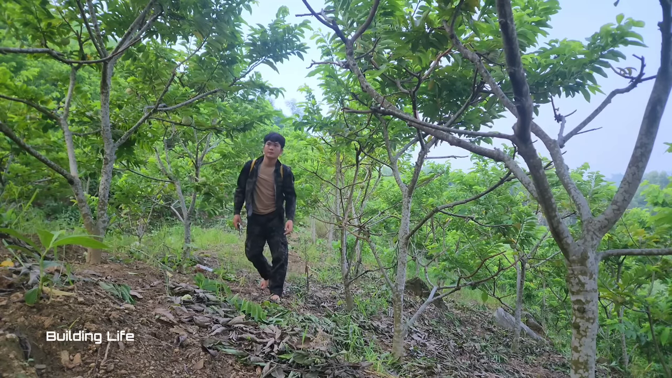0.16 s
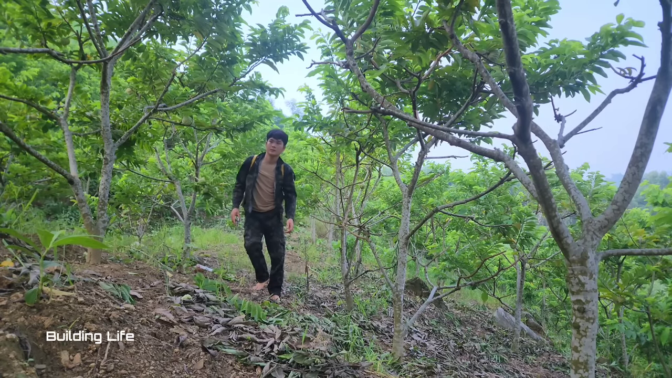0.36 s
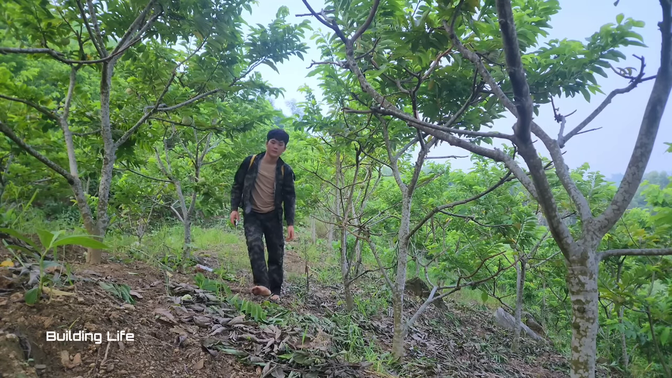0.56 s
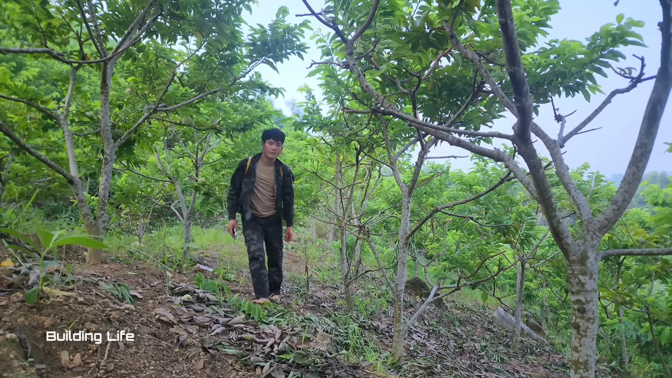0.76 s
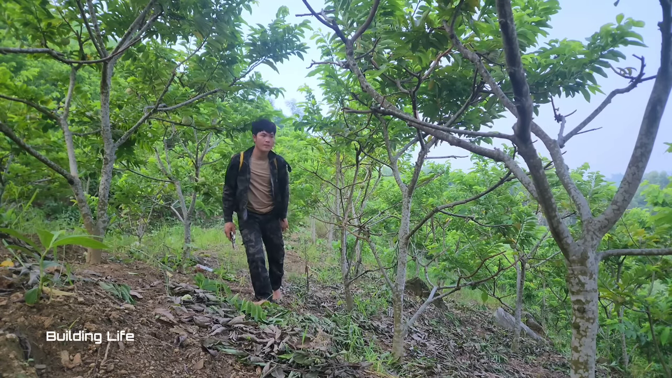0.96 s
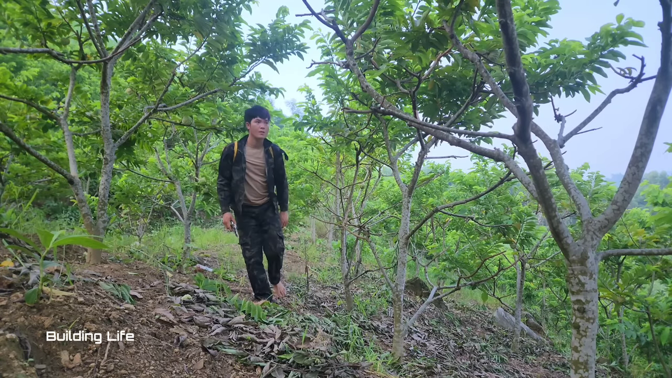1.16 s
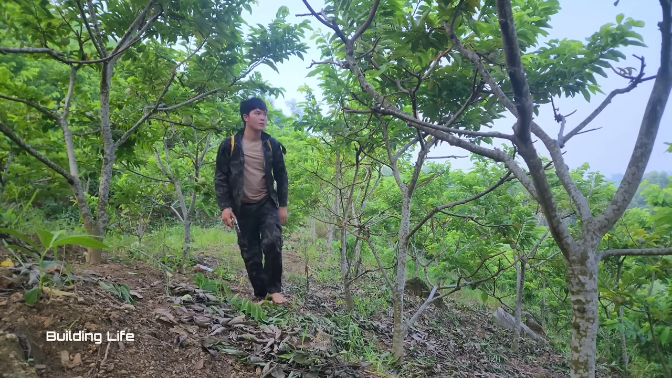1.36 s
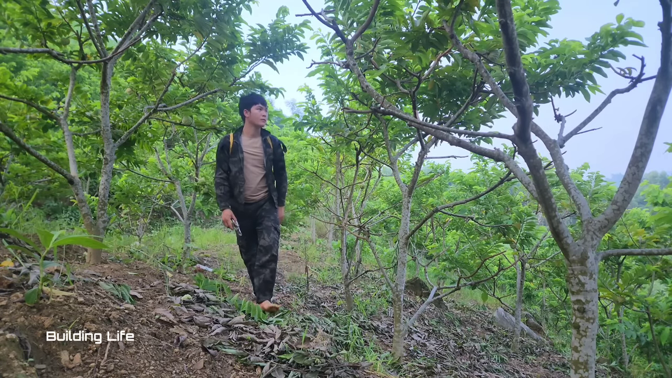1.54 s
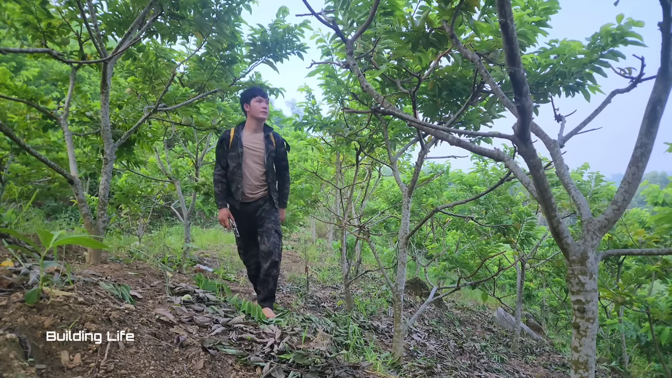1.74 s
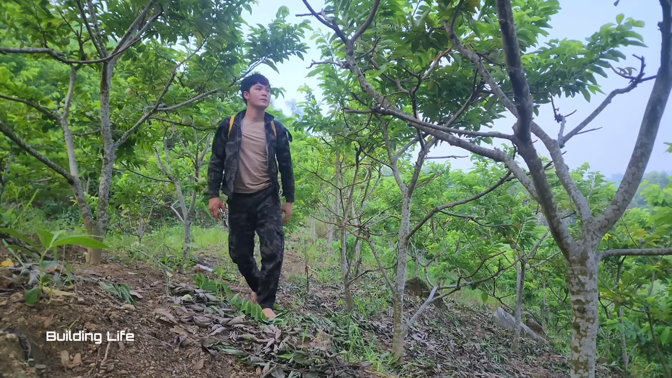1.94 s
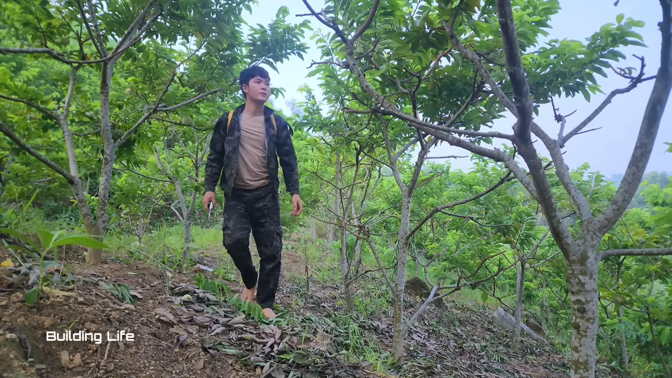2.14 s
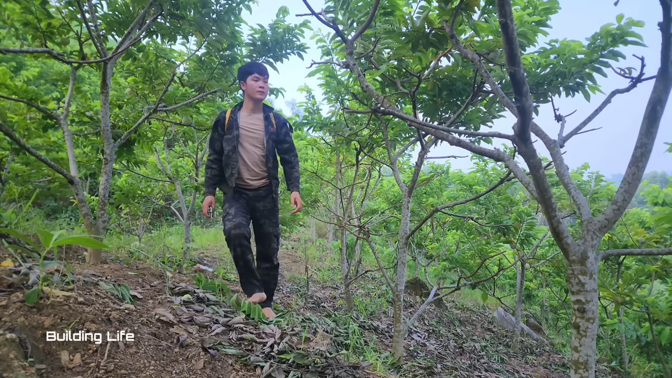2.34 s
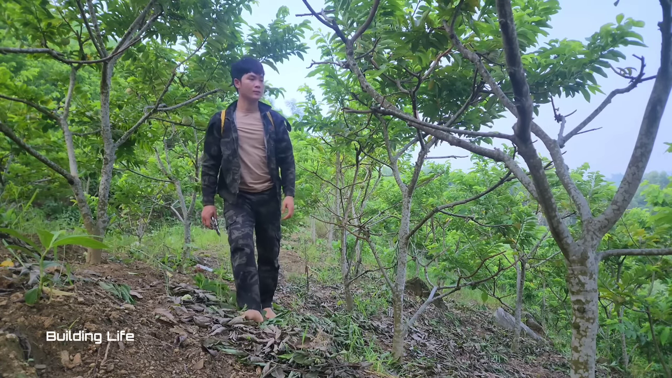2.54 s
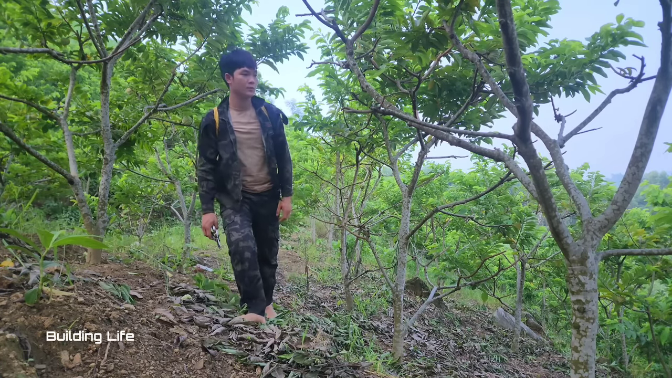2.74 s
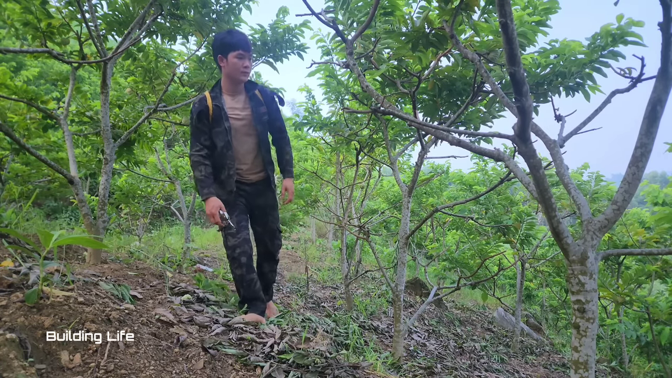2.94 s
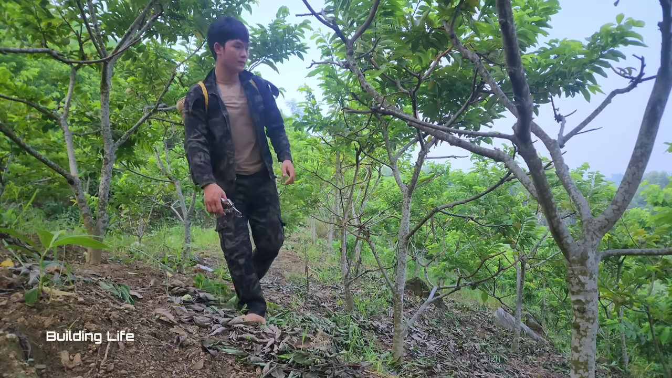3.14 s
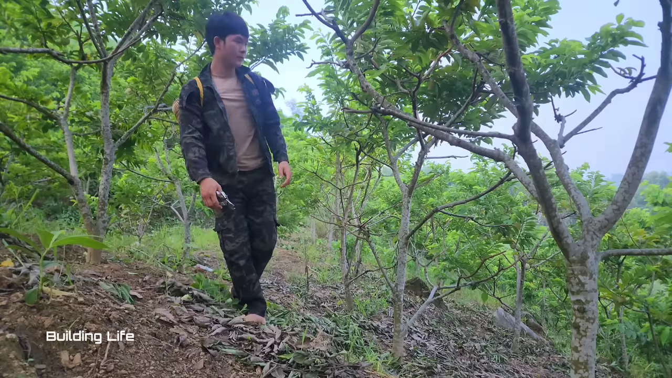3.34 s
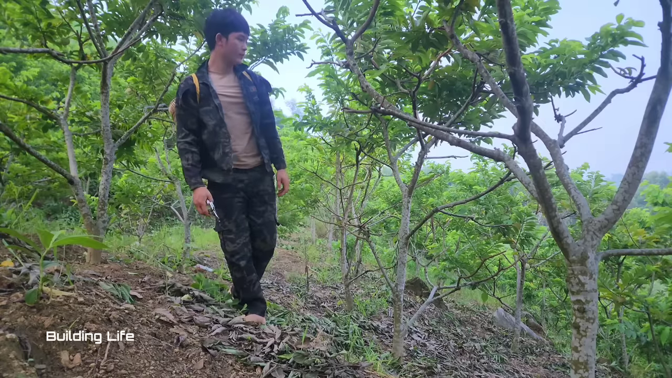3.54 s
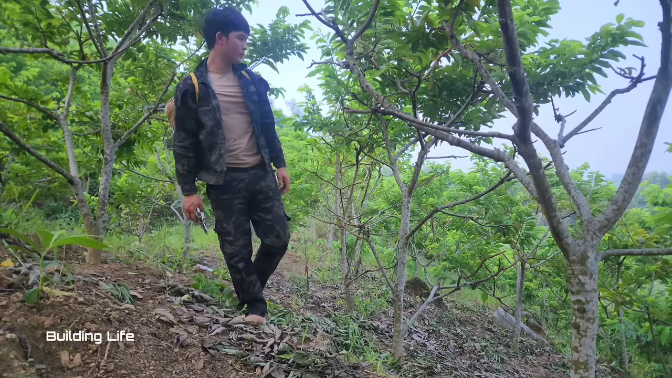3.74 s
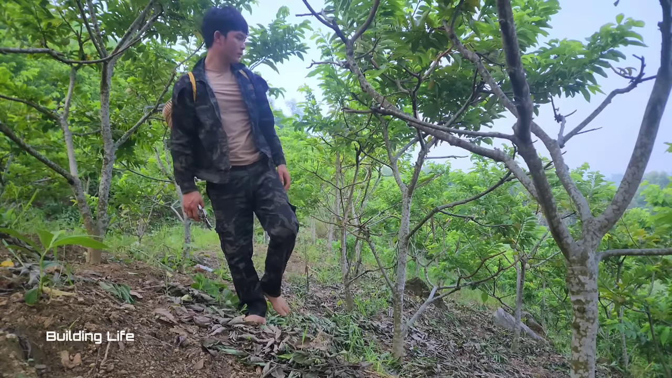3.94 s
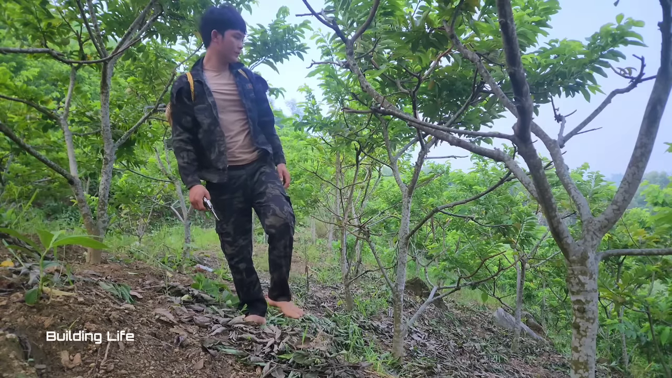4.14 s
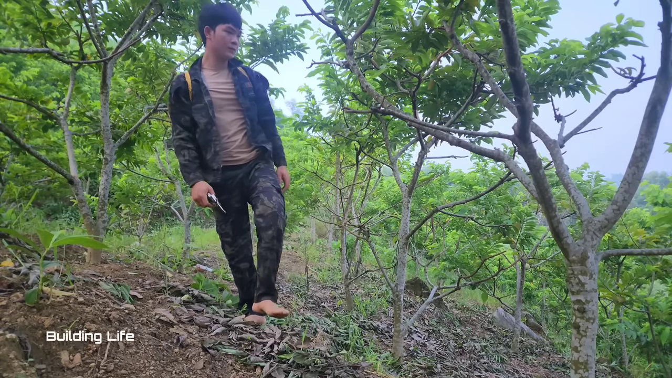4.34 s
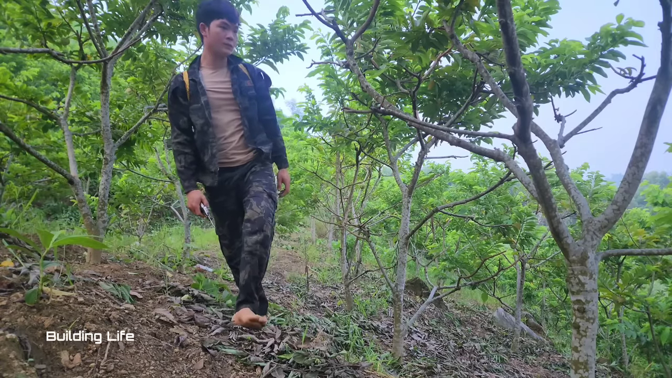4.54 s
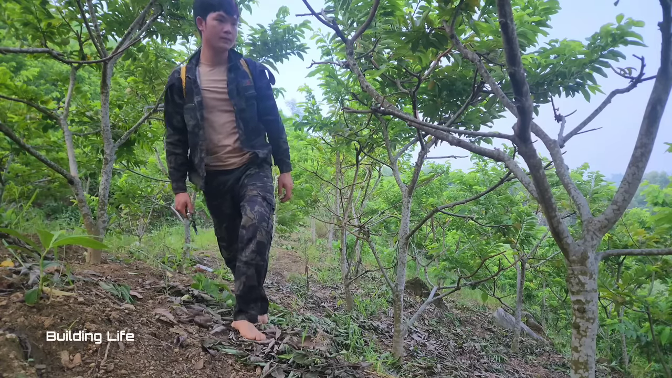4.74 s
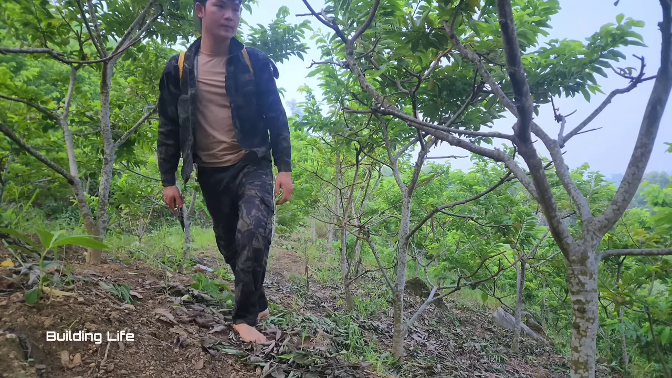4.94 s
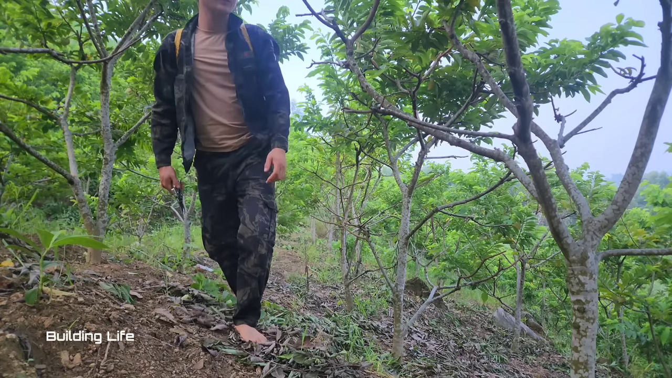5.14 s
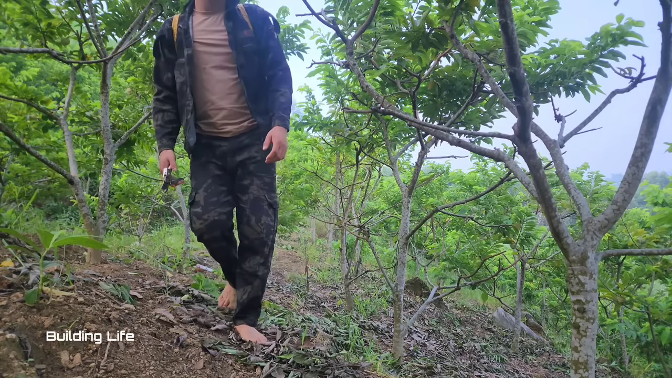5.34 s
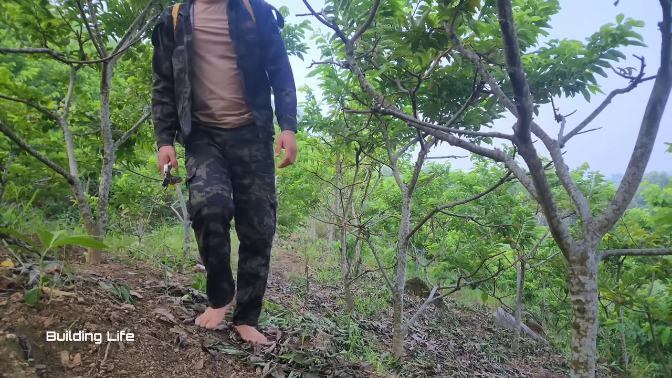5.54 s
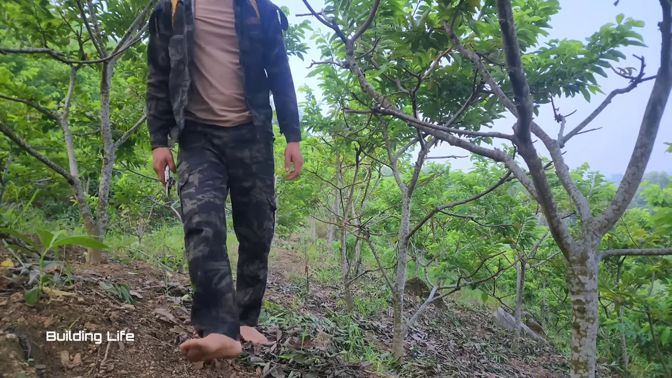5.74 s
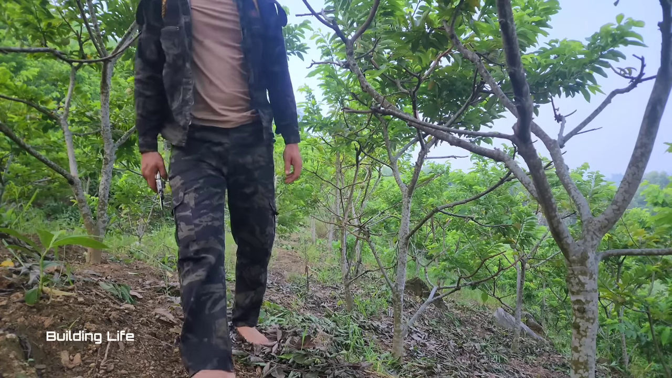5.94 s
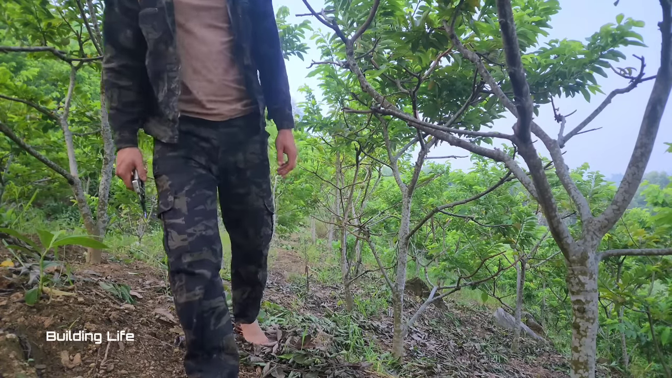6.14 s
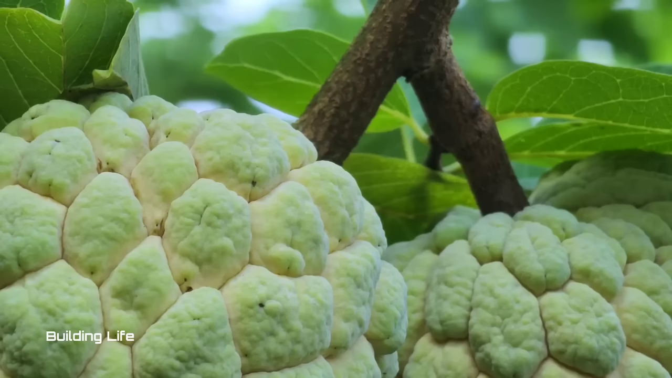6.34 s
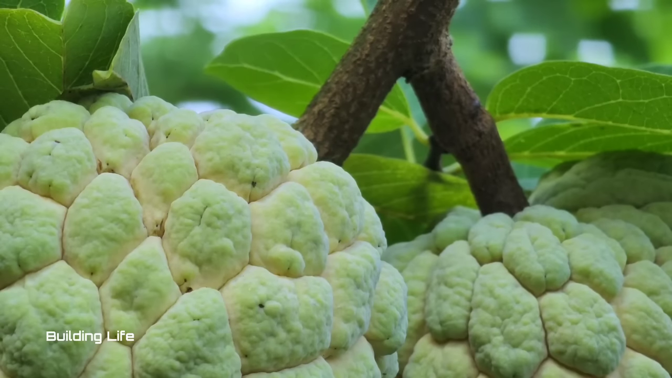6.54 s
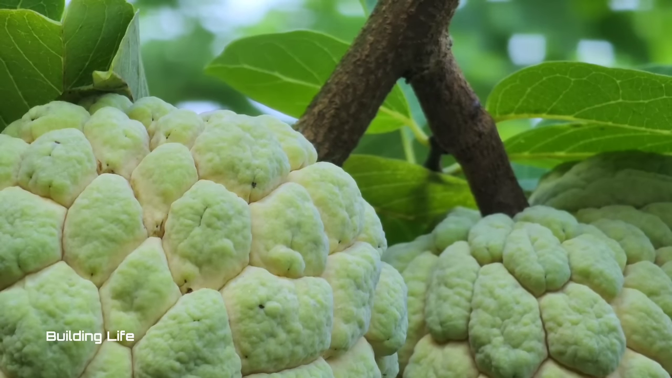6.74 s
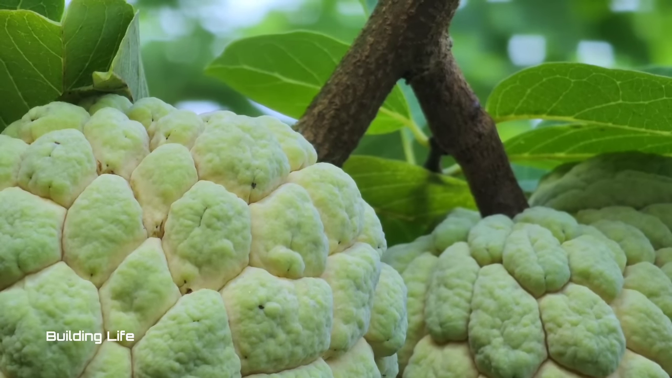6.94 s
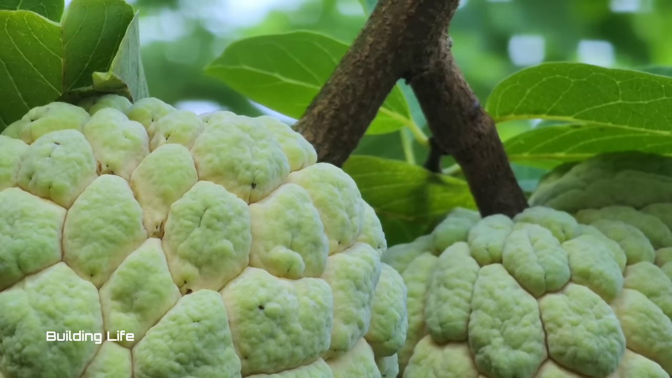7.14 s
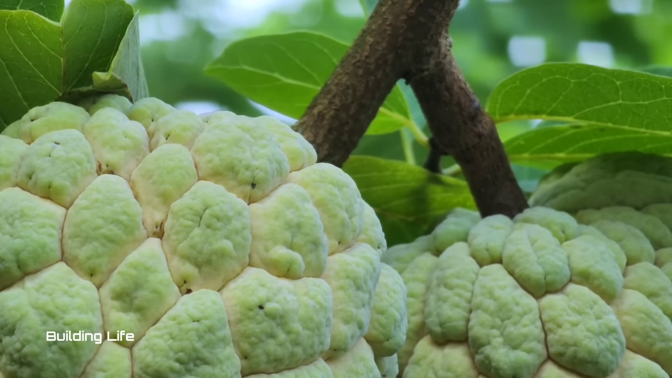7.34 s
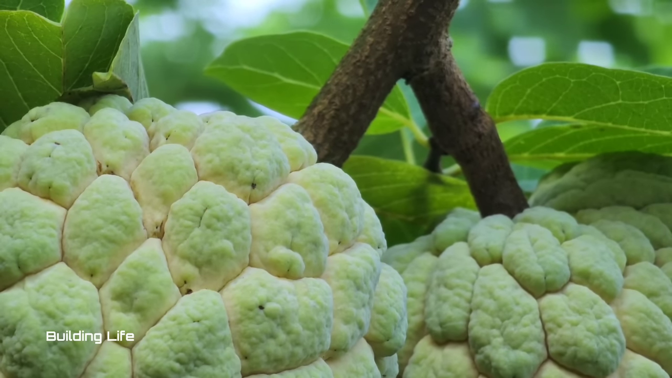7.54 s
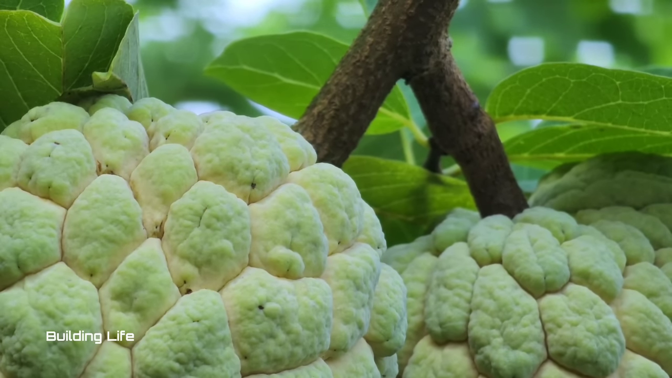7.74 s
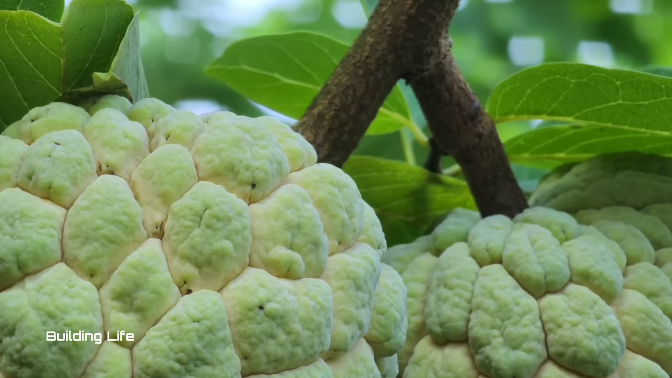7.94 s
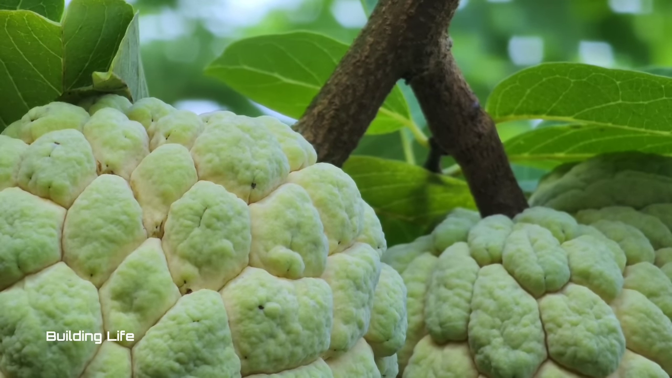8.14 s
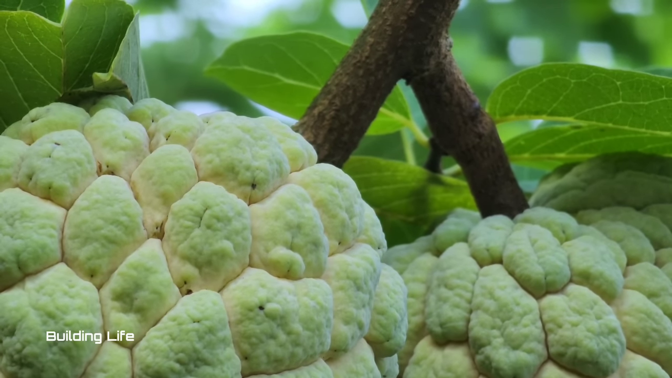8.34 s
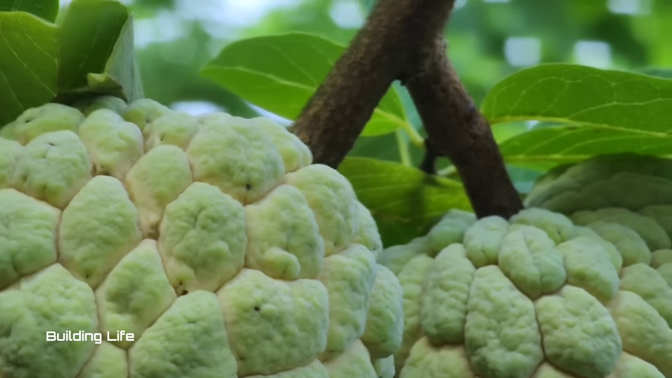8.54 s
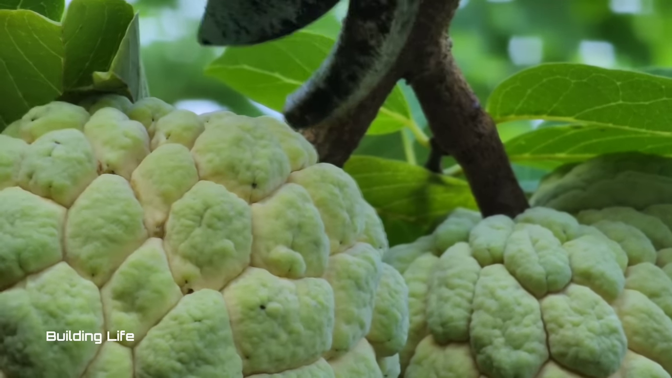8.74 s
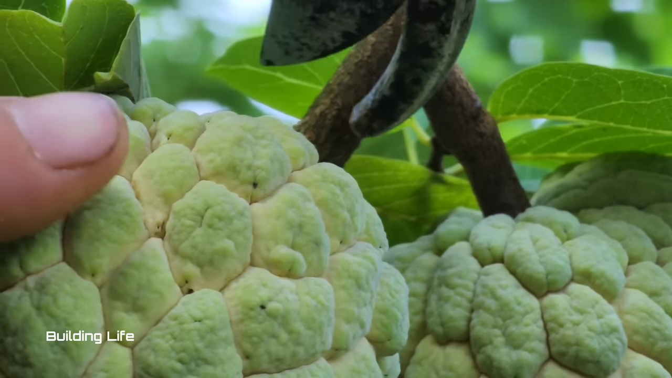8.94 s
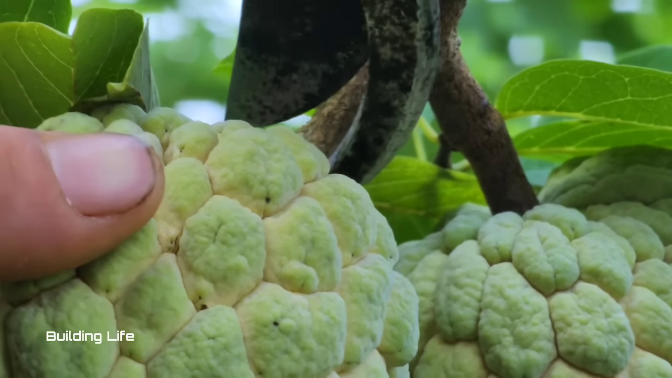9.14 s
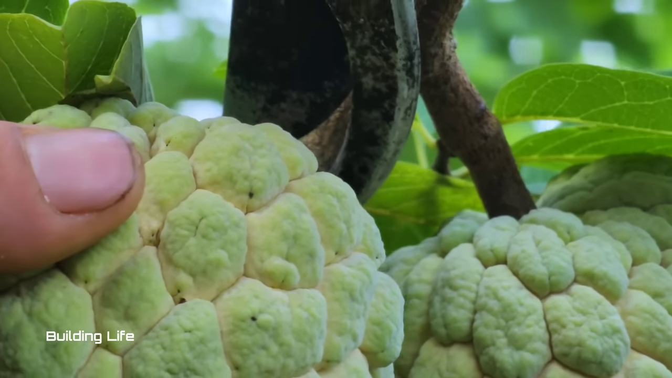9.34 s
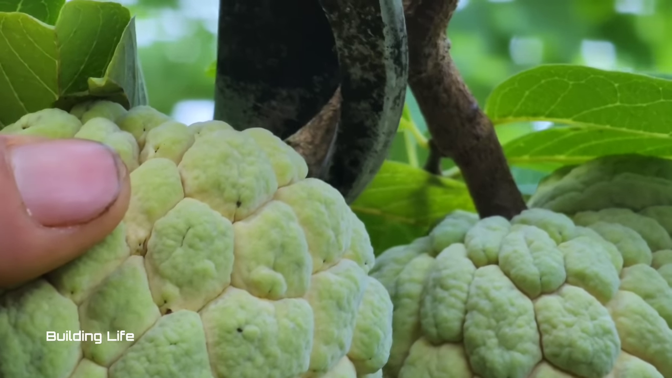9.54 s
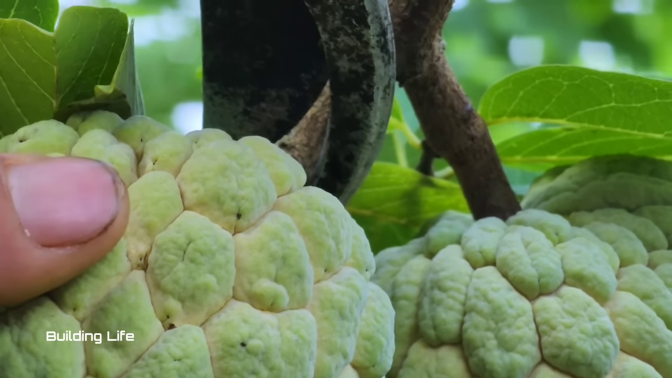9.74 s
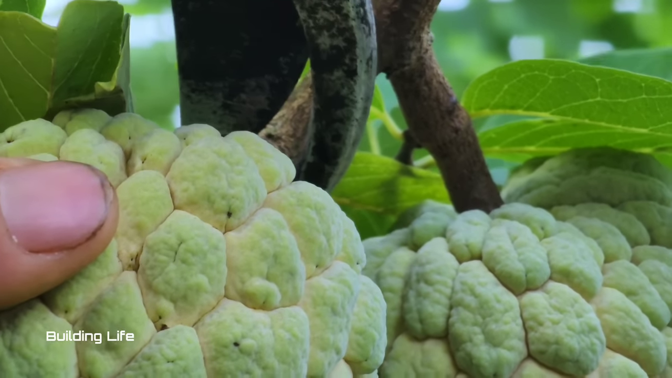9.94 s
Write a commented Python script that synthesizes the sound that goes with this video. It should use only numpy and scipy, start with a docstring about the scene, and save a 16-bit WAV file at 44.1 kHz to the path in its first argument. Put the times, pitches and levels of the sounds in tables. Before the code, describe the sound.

Someone walks closer over leaves and twigs amid high, chirring insects, before a tugged branch rustles and pruning shears click twice.

```python
"""Crickets fill an orchard, each wing stroke a short fuzzy tone, over a far chorus and soft air.
A far bird whistles downward. Someone walks up over dry leaves and twigs, and a run of chips passes.
Then, close in a tree, nearer insects trill, tugged leaves brush, a bumped branch thuds and rings,
and pruning shears click as they spring open."""
import sys
import numpy as np
from scipy import signal
from scipy.fft import rfft, irfft, next_fast_len
from scipy.io import wavfile
from scipy.ndimage import uniform_filter1d

SR = 44100
rng = np.random.default_rng(int(sys.argv[2]) if len(sys.argv) > 2 else 0)


def inscribe(sig):
    """Save sig as 16-bit PCM at rate SR to the path in sys.argv[1].

    A 1-D sig is mono; a 2-D sig holds one channel per row.
    Samples are clipped to [-1, 1] before scaling.
    """
    pcm = np.round(np.clip(np.atleast_2d(sig).T, -1, 1) * 32767)
    wavfile.write(sys.argv[1], SR, pcm.astype(np.int16))


N = 440547
T = np.arange(N) / SR


def amp(db):
    """Decibels to gain."""
    return 10 ** (np.asarray(db) / 20)


def unit(x):
    """Scales to an rms of one."""
    return x / np.sqrt(np.mean(x ** 2) + 1e-20)


def add(mix, s, sound):
    """Lays a stereo sound into the mix at time s."""
    part = mix[:, round(s * SR):][:, :sound.shape[1]]
    part += sound[:, :part.shape[1]]


def colour(x, points):
    """Equalises with a curve of (frequency [Hz], gain [dB]) points."""
    n = x.shape[-1]
    size = next_fast_len(n)
    hz, db = np.transpose(points)
    gain = amp(np.interp(np.log(np.fft.rfftfreq(size, 1 / SR) + 1), np.log(hz), db))
    return irfft(rfft(x, size) * gain, size)[..., :n]


def drift(rate):
    """A random wander of rms one, with rate turning points a second."""
    knots = rng.standard_normal(4096)
    return unit(np.interp(T * rate, np.arange(len(knots)), knots))


def hiss():
    """White noise, unrelated left and right."""
    return rng.standard_normal((2, N))


def resonate(x, hz, width):
    """A steep resonance that follows the pitch hz."""
    carrier = np.exp(2j * np.pi * np.cumsum(hz * np.ones(N)) / SR)
    pole = np.exp(-np.pi * width / SR)
    return unit((carrier * signal.sosfilt([[1 - pole, 0, 0, 1, -pole, 0]] * 3, x / carrier)).real)


def ring(modes, t):
    """A struck body rings as a few decaying sines."""
    return sum(amp(db - 60 * t / t60) * np.sin(2 * np.pi * hz * t) for hz, db, t60 in modes)


def pan(db):
    """Stereo gains that put the left db above the right."""
    return amp(np.array([[db], [-db]]) / 2)


def from_left(x, left_db, spread, lag):
    """A sound ahead and to the left reaches the right side lag samples late."""
    right = (np.roll(x[0], lag) + spread * x[1]) / np.hypot(1, spread)
    return pan(left_db) * np.array([x[0], right])


def scatter(x, t60, wet_db):
    """Trunks and leaves return a short spray of echoes, different on each side."""
    t = np.arange(SR // 2) / SR
    taps = rng.standard_normal((2, len(t))) * (rng.random((2, len(t))) < .1)
    taps *= (t > .003) * amp(-60 * t / t60)
    taps *= amp(wet_db) / np.linalg.norm(taps, axis=1, keepdims=True)
    taps[:, 0] = 1  # the direct sound
    return signal.fftconvolve(np.atleast_2d(x), taps, axes=1)[:, :N] / np.sqrt(1 + amp(wet_db) ** 2)


def swells(rows):
    """Envelope in dB of held swells; each rise and fall time covers 20 dB."""
    level = np.full(N, -140.)
    for s, hold, db, rise, fall in rows:
        ramp = np.maximum((s - T) / rise, (T - s - hold) / fall)
        level = np.maximum(level, db - 20 * np.maximum(ramp, 0))
    return level


def song(bouts, rise_s, fall_s):
    """Envelope in dB of an insect whose bouts all start and stop alike."""
    return swells((s, length, db, rise_s, fall_s) for s, length, db in bouts)


def air(near):
    """Soft rumble and leaf hiss of the open hillside; the bass is alike on both sides."""
    # tone of the air on the path and among the branches: (frequency [Hz], gain [dB])
    path_eq = [(20, -12.5), (50, 1.5), (100, -5.5), (170, -2), (300, -20), (700, -19), (2500, -16.5),
               (6500, -7), (9500, -11.5), (11500, -33), (15500, -24.5)]
    tree_eq = [(20, -2.5), (60, -7), (120, -4.5), (250, -14), (900, -18.5), (2500, -17.5), (6500, -12.5),
               (9000, -16.5), (11500, -25), (15500, -18.5)]
    left, other = hiss()
    shared_bass = colour(left, [(150, -0.5), (400, -18.5), (1500, -42)])
    wind = np.array([left, shared_bass + colour(other, [(150, -0.056), (400, -0.44)])])
    path = amp(-71 + 0.63 * drift(17)) * unit(colour(wind, path_eq))
    tree = amp(-60 + .5 * drift(3.9)) * unit(colour(wind, tree_eq))
    return pan(1.3) * ((1 - near) * path + near * tree)


def chorus(near):
    """Countless far insects merge into steady, faintly shimmering bands."""
    # insect bands: (pitch [Hz], width [Hz], level on the path [dB], level in the tree [dB])
    bands = [(3165, 287, -64, -75.5), (3407, 500, -62, -58.5), (3622, 260, -70.5, -68.5),
             (4638, 820, -61.5, -53.5), (4948, 180, -64.5, -70), (6710, 210, -81, -68),
             (7340, 70, -75, -81), (7432, 840, -65, -65), (8280, 110, -77, -85)]
    out = np.zeros((2, N))
    for hz, width, path_db, tree_db in bands:
        band = amp(path_db + near * (tree_db - path_db)) * resonate(hiss(), hz, width)
        out += band * amp(1.1 * drift(17))
    return out


def stridulate(hz, rate, fall_hz, width, duty, fuzz):
    """Each wing stroke is a short tone that sags in pitch; uneven teeth make it fuzzy."""
    cycle = np.cumsum(rate * (1 + .04 * drift(8))) / SR % 1
    through = np.minimum(cycle / duty, 1)
    pitch = hz + fall_hz * (.5 - through) + .08 * fall_hz * drift(25)
    tone = np.sqrt(2) * np.sin(2 * np.pi * np.cumsum(pitch) / SR)
    force = np.sin(np.pi * through) * amp(drift(17))
    return unit(force * (tone + fuzz * resonate(hiss(), pitch, width)))


def crickets(near):
    """Four nearer crickets scrape their wings; the lead's loudest bouts carry a faint octave."""
    # bouts of the lead cricket and of its octave overtone: (time [s], length [s], level [dB])
    lead_bouts = [(0.35, 1.43, -52), (2.72, 0.9, -54), (4.12, 0.59, -55.5), (5.44, 1.18, -55.5),
                  (6.68, 0.52, -52.5), (7.55, .64, -48), (8.4, 0.148, -50), (8.79, 0.6, -47),
                  (9.6, 0.065, -45), (9.79, .2, -43)]
    octave_bouts = [(7.65, 0.66, -71), (8.75, 0.66, -72), (9.65, .34, -71.5)]
    idle_db = -61
    effort_db = np.maximum(song(lead_bouts, rise_s=.22, fall_s=.14), idle_db)
    strokes_per_s = 23 + 0.58 * (effort_db + 52)  # louder song, faster wings
    lead = stridulate(4850, strokes_per_s, fall_hz=339.4, width=595, duty=1, fuzz=3.2)
    rival = stridulate(4760, 1.13 * strokes_per_s, fall_hz=301, width=480, duty=.8, fuzz=2.4)
    pair = amp(effort_db) * (lead + amp(-8) * rival)
    high = amp(-67) * (1 - near) * stridulate(7360, 17.5, fall_hz=223.4, width=200, duty=.55, fuzz=1.3)
    slow = amp(-64) * near * stridulate(7480, 9.2, fall_hz=448, width=490, duty=.59, fuzz=2.2)
    octave_db = song(octave_bouts, rise_s=.35, fall_s=.17)
    octave = amp(octave_db) * stridulate(2 * 4850, 22.04, fall_hz=153.7, width=450, duty=.98, fuzz=2.7)
    return scatter(pan(-.7) * (pair + high + slow + octave), t60=.06, wet_db=0)


def bird(start_hz=2860):
    """A far bird: short, nearly level notes and long slides down, blurred by the trees."""
    # whistles: (time [s], length [s], pitch fall [Hz], level [dB])
    whistles = [(0.798, 0.07, 50, -64.5), (0.915, .2, 832, -65.5), (1.379, 0.17, 497, -74),
                (3.37, .22, 579, -75), (4.128, .06, 0, -67), (4.255, .19, 829, -67.5),
                (7.42, 0.074, 53, -54.5), (7.68, .31, 889, -55.5), (9.055, .21, 721.5, -65)]
    out = np.zeros((2, N))
    for s, length, fall_hz, db in whistles:
        through = np.linspace(0, 1, round(length * SR))
        tone = np.sin(2 * np.pi * np.cumsum(start_hz - fall_hz * through) / SR)
        add(out, s, pan(-0.8) * amp(db) * signal.windows.tukey(len(tone), .5) * tone)
    return scatter(out, t60=.35, wet_db=2)


def patchy(x, depth_db, size=256):
    """Lifts and dips patches of the spectrum about 20 ms long and 400 Hz wide."""
    spectra = signal.stft(x, nperseg=size)[2]
    field = rng.standard_normal(spectra.shape[:0:-1]).T
    field = unit(uniform_filter1d(uniform_filter1d(field, size=2, axis=0), size=7, axis=1))
    return signal.istft(spectra * amp(depth_db * field), nperseg=size)[1][:, :N]


def rustle(rows, hold_s, snaps_per_s, spread_db, clump_db, patch_db):
    """Many tiny leaf snaps, coming in clumps: a papery body and a crisp top."""
    # tone of the body and of the top: (frequency [Hz], gain [dB])
    body_eq = [(90, -24), (160, -14), (300, -7.5), (600, -6), (1300, -1), (2500, -1), (3400, -9),
               (5700, -64)]
    top_eq = [(1500, -29.5), (3000, -6), (5000, -3), (8000, -8.5), (10000, -7.5), (13000, -9),
              (15500, -13.5)]
    sizes = amp(spread_db * np.minimum(rng.exponential(1, N), 4))
    snaps = sizes * (rng.random(N) < snaps_per_s / SR)
    grains = patchy(unit(hiss() * snaps) + hiss(), patch_db) * amp(clump_db * drift(110))
    body = amp(swells((s, hold_s, db, rise, fall) for s, db, _, rise, fall in rows))
    top = amp(swells((s, hold_s, db + crisp_db, rise, fall) for s, db, crisp_db, rise, fall in rows))
    return body * unit(colour(grains, body_eq)) + top * unit(colour(grains, top_eq))


def leaf_steps():
    """Feet press and scuff dry leaves on the path ahead."""
    # steps: (time [s], body level [dB], top against body [dB], rise [s], fall [s])
    steps = [(1.095, -69, 8, 0.059, 0.061), (1.55, -72.5, 1.5, 0.14, 0.3),
             (2.02, -87.5, 25.5, 0.026, 0.051), (2.085, -79, 13, .04, 0.076), (2.33, -61, 8.5, .035, .2),
             (2.395, -57.5, 6, 0.076, .16), (2.59, -67.5, 1, .12, .1), (2.865, -77, 7, 0.036, .05),
             (3.195, -53.5, 4.5, 0.072, .19), (3.795, -67, 7, 0.19, 0.17), (4.655, -61, 4, 0.12, 0.076),
             (4.85, -76.5, 3.5, 0.2, 1), (5.425, -57, 9, 0.073, 0.15), (5.73, -72, 10.5, .06, .25),
             (6.025, -62, 5.5, .11, .27), (6.395, -51, 1, 0.047, 0.11)]
    crunch = rustle(steps, hold_s=.021, snaps_per_s=2200, spread_db=2.6, clump_db=1.1, patch_db=3.5)
    return from_left(crunch, left_db=3.5, spread=1, lag=6)


def clicks(rows):
    """Brief bright cracks, each with a ringing note; the ground answers 8 ms later."""
    # tone of a crack: (frequency [Hz], gain [dB])
    crack_eq = [(700, -44), (1300, -33), (2000, -3), (2600, -19), (3600, -2.5), (4300, -5.5), (5800, -4.5),
                (8300, -5), (9500, -14), (11500, -5.5), (15500, -14.5)]
    out, t = np.zeros((2, N)), np.arange(SR // 16) / SR
    envelope = np.minimum(t / .0002, 1) * amp(-60 * np.maximum(t - .001, 0) / .007)
    for s, db, left_db, modes in rows:
        crack = envelope * unit(colour(rng.standard_normal((2, len(t))), crack_eq))
        click = pan(left_db) * amp(db) * (crack + ring(modes, t))
        add(out, s, click)
        add(out, s + .008, amp(-16.5) * click)
    return scatter(out, t60=.11, wet_db=-9)


def twigs(wood_hz=1450, wood_t60=.013):
    """Twigs snap and tick with one short woody note."""
    # snaps: (time [s], level [dB], note against crack [dB], left over right [dB])
    snaps = [(1.455, -55, -16, 4), (4.276, -55, -27, 13), (5.741, -50.5, -24, 13), (6.674, -40, -19, -4),
             (6.6942, -28.5, -5.5, 0), (6.943, -53, 3, 0), (7.144, -52, -12, 2), (7.699, -48, -6, 0),
             (7.778, -44.5, 2, 1), (9.379, -50.5, -11, 2)]
    return clicks((s, db, left_db, [(wood_hz, wood_db, wood_t60)]) for s, db, wood_db, left_db in snaps)


def blows(rows):
    """Soft blows: each a dull burst of noise that dies quickly."""
    # tone of a blow: (frequency [multiple of its pitch], gain [dB])
    blow_eq = [(.1, -29), (.45, -9), (1, 0.5), (1.8, -1), (3.5, -14), (8, -32), (30, -68)]
    out, t = np.zeros((2, N)), np.arange(SR // 3) / SR
    for s, db, hz, t60 in rows:
        burst = colour(rng.standard_normal((2, len(t))), [(k * hz, gain) for k, gain in blow_eq])
        envelope = (1 - np.exp(-t * hz / 0.44)) * amp(-60 * t / t60)
        blow = burst * envelope
        blow *= np.linalg.norm(envelope) / np.linalg.norm(blow, axis=1, keepdims=True)
        add(out, s, amp(db) * blow)
    return out


def footfalls():
    """Heels and toes land close by, ahead on the left."""
    # landings: (time [s], level [dB], pitch [Hz], t60 [s])
    landings = [(1.545, -64, 800, 0.072), (2.615, -56, 487, 0.019), (6.0495, -41.5, 1420, 0.027),
                (6.1075, -41, 930, 0.071), (6.1405, -41.5, 895, 0.086), (6.197, -49, 1080, 0.087),
                (6.285, -59.5, 610, 0.1), (6.368, -46, 818, 0.12), (6.379, -38, 1000, 0.12),
                (6.411, -35, 1300, 0.048), (6.484, -43, 610, 0.052), (6.488, -42, 223, 0.091)]
    return scatter(from_left(blows(landings), left_db=3, spread=.5, lag=12), t60=.14, wet_db=-16)


def chips(start_s=4.411, gap_s=.0393, length_s=.0222, count=6):
    """A quick run of falling chips with a faint octave; it grows, then holds."""
    out, through = np.zeros((2, N)), np.linspace(0, 1, round(length_s * SR))
    phase = 2 * np.pi * np.cumsum(3430 - 380 * through) / SR
    chip = np.sin(np.pi * through) * (np.sin(phase) + amp(-11.5) * np.sin(2 * phase))
    for after in np.arange(count) * gap_s:
        db = -46.5 - 10 * np.exp(-after / .034)
        add(out, start_s + after, pan(9.3) * amp(db) * chip)
    return scatter(out, t60=.056, wet_db=-2.5)


def branch_tugs(hold_s=.012):
    """Each tug on the branch brushes its leaves all round and makes it rumble."""
    # tugs: (time [s], leaf body [dB], top against body [dB], rumble [dB], rise [s], fall [s])
    tugs = [(6.59, -59.5, 6, -60.5, .12, 0.55), (6.675, -59, 9, -58.5, .08, .55),
            (6.99, -66, 8, -56, 0.57, .4), (7.17, -62, 13, -54.5, 0.097, 0.36),
            (7.25, -67, 18.5, -62, 0.11, 0.36), (7.38, -69.5, 23, -65, .45, .35),
            (7.51, -68.5, 18.5, -59, 0.24, 0.48), (7.755, -57.5, 3, -48.5, .07, .08),
            (8.11, -66.5, 9.5, -54.5, 0.46, 0.99), (8.42, -63.5, 6, -54.5, 0.32, 1),
            (8.72, -70.5, 13.5, -57.5, 0.24, 0.76), (9.17, -79, 18, -61.5, .15, 0.32)]
    # tone of the swaying branch: (frequency [Hz], gain [dB])
    sway_eq = [(20, 1), (50, 4.5), (100, 2), (180, -6.5), (350, -12.5), (900, -25.5)]
    brushes = [(s, db, crisp_db, rise, fall) for s, db, crisp_db, _, rise, fall in tugs]
    foliage = rustle(brushes, hold_s, snaps_per_s=2500, spread_db=1.8, clump_db=1.5, patch_db=2.5)
    rumble_db = swells((s, hold_s, db, rise, fall) for s, _, _, db, rise, fall in tugs)
    rumble = amp(rumble_db) * unit(colour(hiss(), sway_eq))
    return pan(0.97) * foliage + from_left(rumble, left_db=4, spread=.84, lag=12)


def tree_cricket(soft_hz=3455, soft_db=-55.5, hz_per_db=10.5):
    """A lower, purer trill; effort lifts its pitch and brings out a buzzy third harmonic."""
    # soft and loud bouts: (time [s], length [s], level [dB])
    bouts = [(6.6, .12, -47.5), (6.8, 0.56, -56), (8.0, 0.26, -44), (8.35, .6, -54.5), (9.08, .23, -43.5),
             (9.42, 0.21, -56)]
    effort_db = song(bouts, rise_s=.22, fall_s=.2)
    level = amp(effort_db)
    pitch = soft_hz + hz_per_db * np.maximum(effort_db - soft_db, 0)
    tone = stridulate(pitch, 23.5, fall_hz=210, width=180, duty=.95, fuzz=.6)
    third = unit(resonate(hiss(), 3 * pitch, 490) * abs(tone)) * level / level.max()
    return scatter(level * (tone + amp(-23.5) * third), t60=.091, wet_db=8.5)


def branch_bumps():
    """Very close, dull bumps shake left and right against each other; the branch rings on, hollow."""
    # bumps: (time [s], level [dB], pitch [Hz], t60 [s])
    bumps = [(7.755, -49, 200, 0.067), (8.479, -33, 390, 0.098), (8.496, -21, 63, 0.23),
             (8.555, -33, 230, 0.059), (8.559, -24.5, 80, 0.094)]
    # modes of the branch: (pitch [Hz], level against the bump [dB], t60 [s])
    modes = [(97, -10, 0.29), (215, -13, 0.16), (538, -16, 0.063), (795, -34, 0.073)]
    out = from_left(blows(bumps), left_db=6, spread=1.8, lag=9) * [[1], [-1]]
    note = ring(modes, np.arange(SR // 2) / SR)
    for s, db, _, _ in bumps:
        add(out, s, pan(11) * amp(db) * note)
    return scatter(out, t60=.14, wet_db=-16)


def shears():
    """Pruning shears click as they spring open and touch; the steel rings briefly."""
    # touches: (time [s], level [dB], left over right [dB])
    touches = [(8.1921, -18.5, 2), (8.7362, -29, 3)]
    # modes of the blades: (pitch [Hz], level against the click [dB], t60 [s])
    blades = [(1920, -16, 0.021), (4270, -9, 0.02), (7970, -19, 0.057), (11760, -29, .08)]
    return clicks((s, db, left_db, blades) for s, db, left_db in touches)


def scene():
    """The bed of air and insects crossfades from path to tree, under the calls and the handling."""
    # the move into the tree: (time [s], share of the tree's ambience [0-1])
    arrival = [(6.42, 0.086), (6.6, 0.94)]
    near = np.interp(T, *np.transpose(arrival))
    bed = air(near) + chorus(near) + crickets(near)
    calls = tree_cricket() + chips() + bird()
    walk = leaf_steps() + twigs() + footfalls()
    pruning = branch_tugs() + branch_bumps() + shears()
    return bed + calls + walk + pruning


def record(dry, edge_hz=15700):
    """A steep low-pass trims the highest treble."""
    lowpass = signal.firwin(511, edge_hz, window=("kaiser", 9), fs=SR)
    return signal.oaconvolve(dry, lowpass[None], "same")


dry = scene()
out = record(dry)
inscribe(out)
```